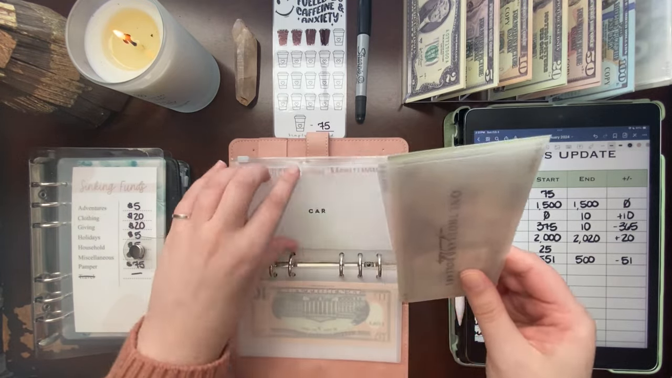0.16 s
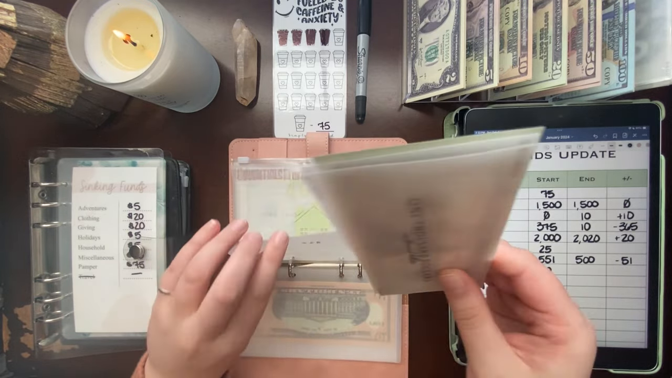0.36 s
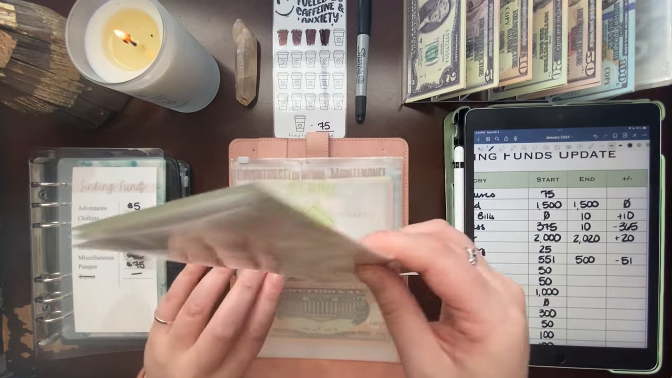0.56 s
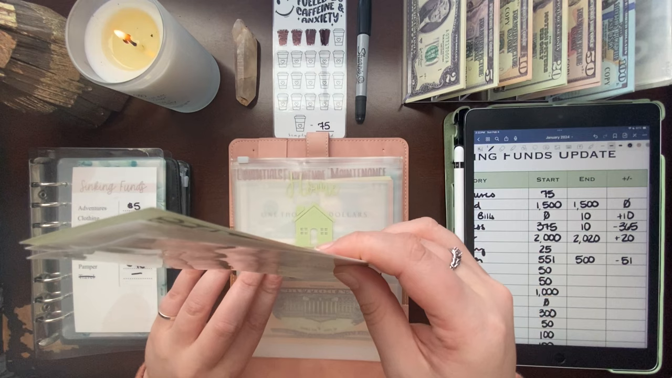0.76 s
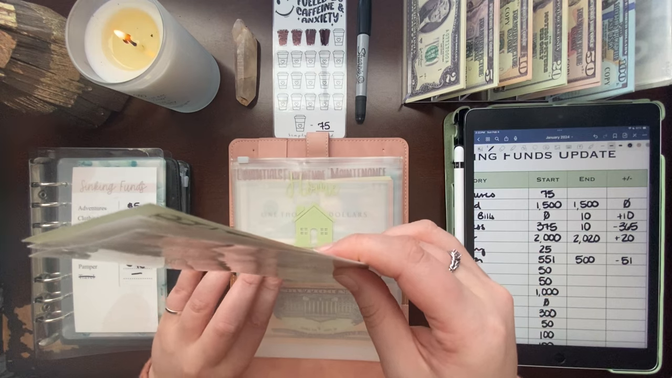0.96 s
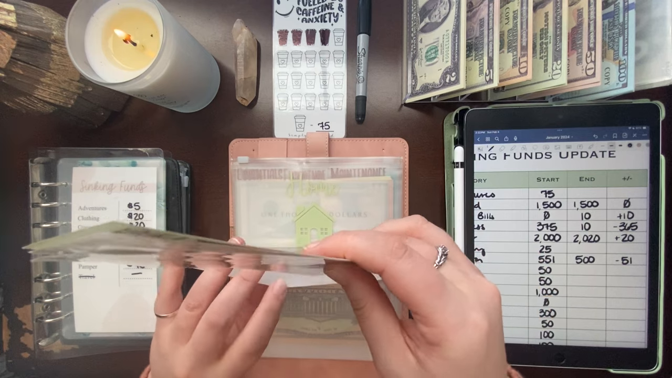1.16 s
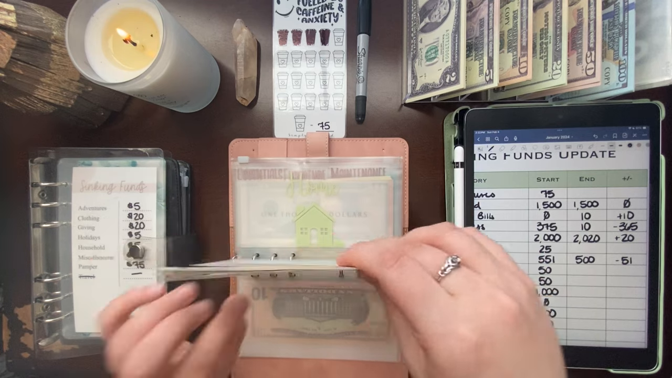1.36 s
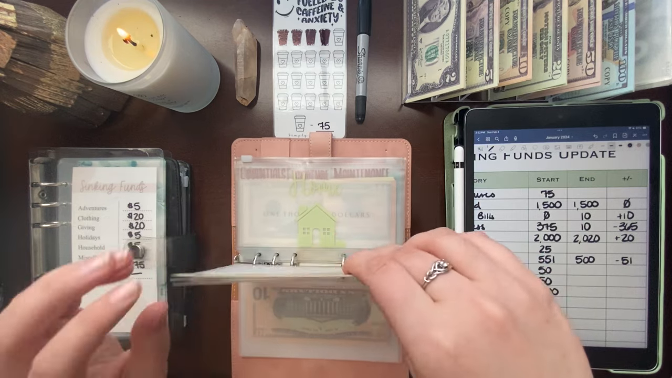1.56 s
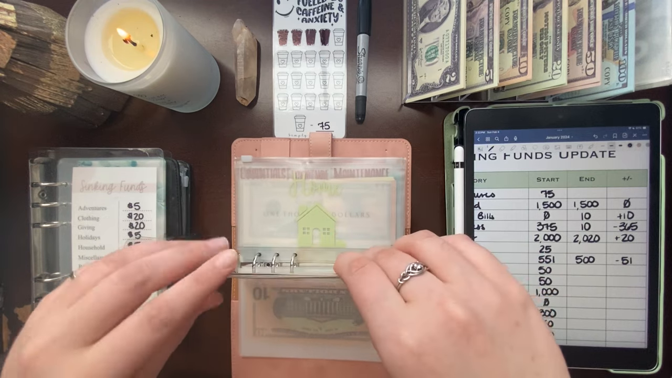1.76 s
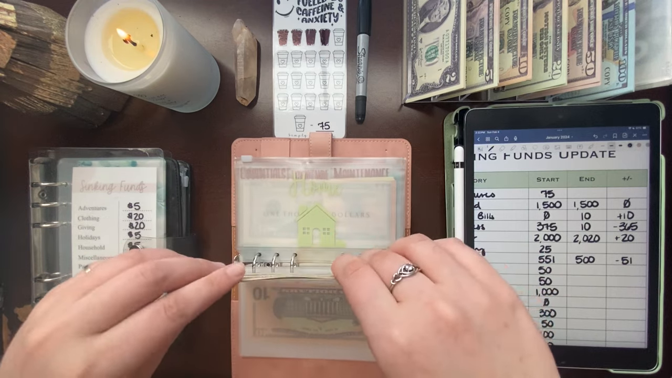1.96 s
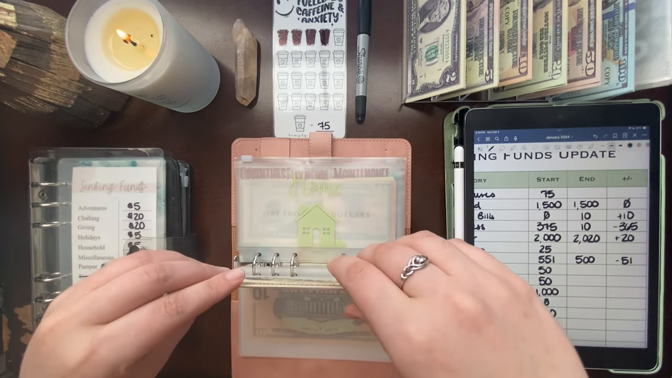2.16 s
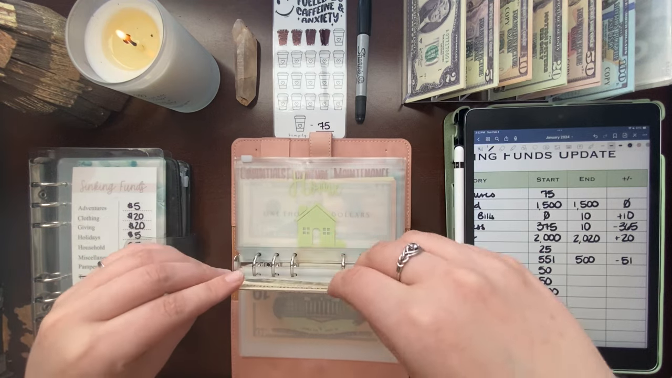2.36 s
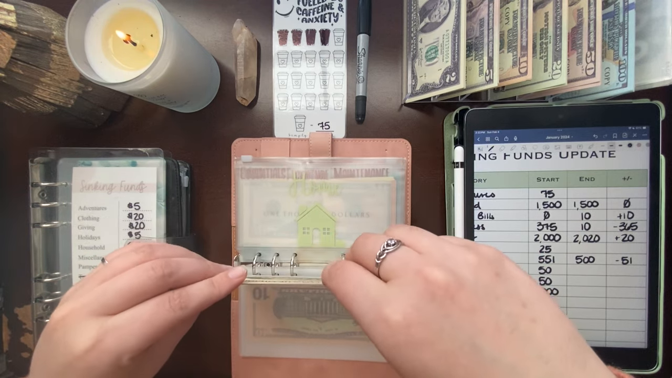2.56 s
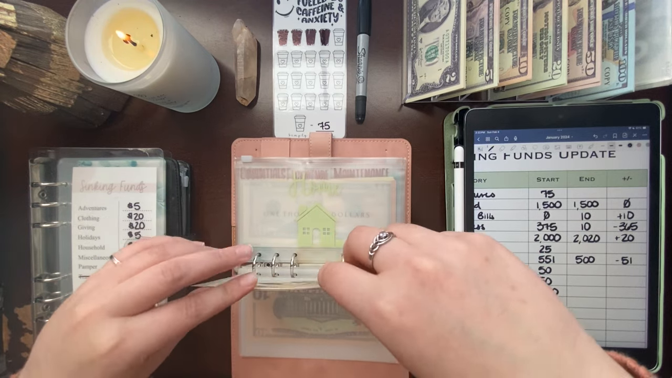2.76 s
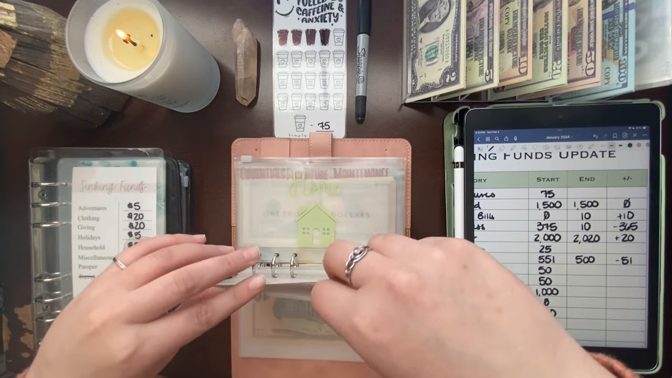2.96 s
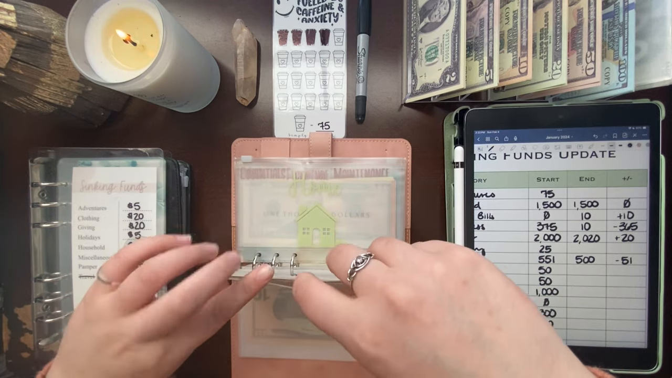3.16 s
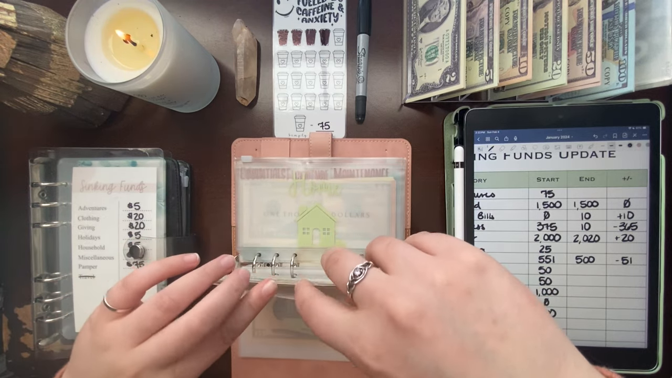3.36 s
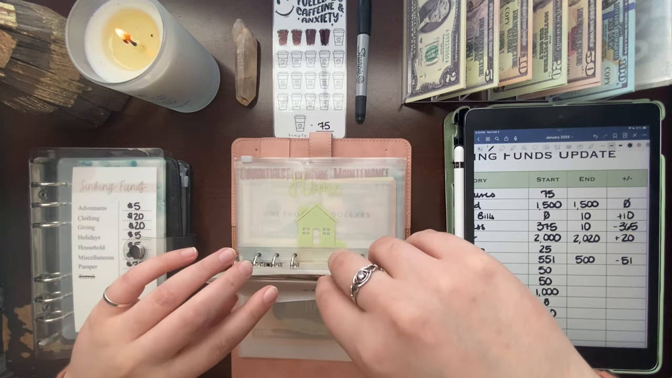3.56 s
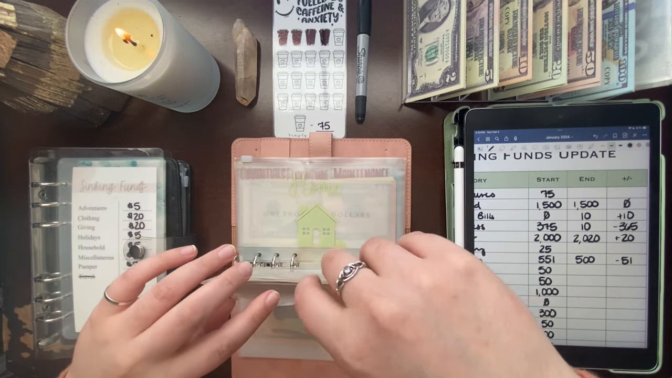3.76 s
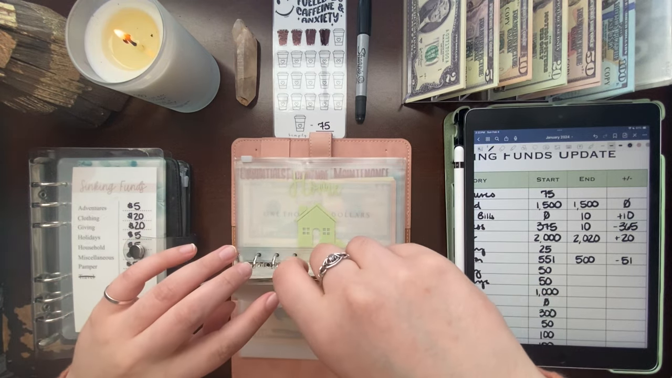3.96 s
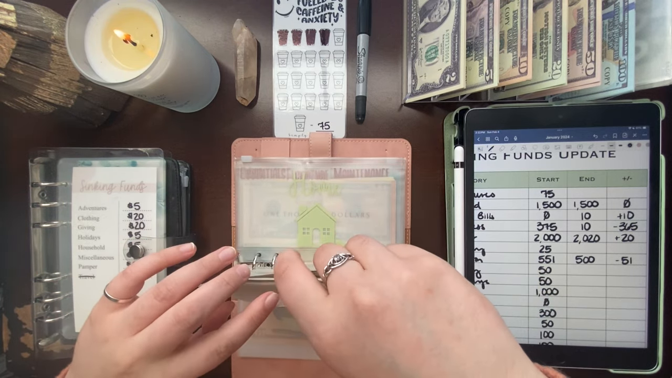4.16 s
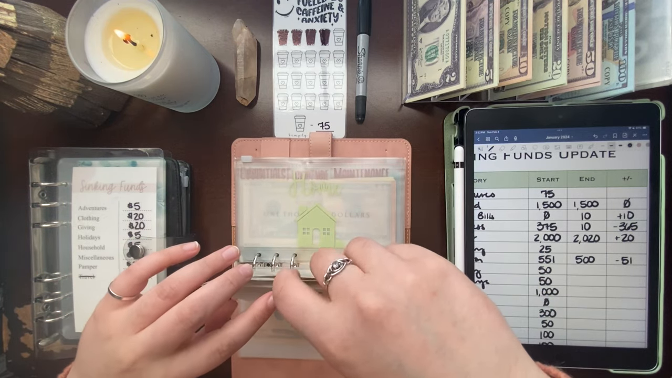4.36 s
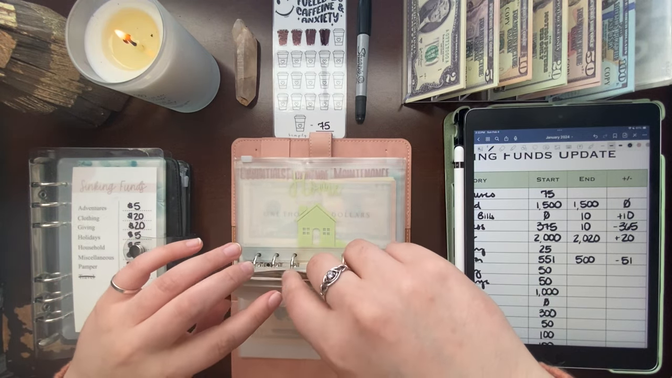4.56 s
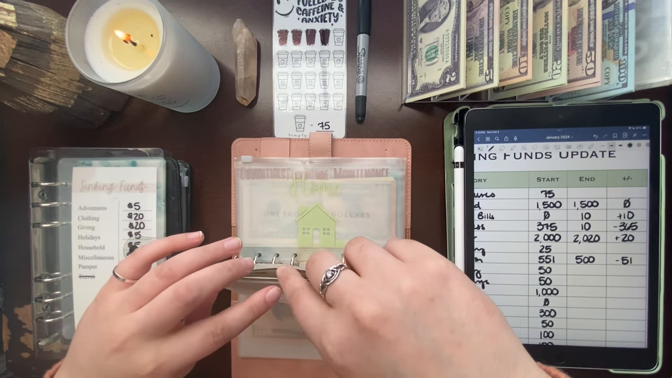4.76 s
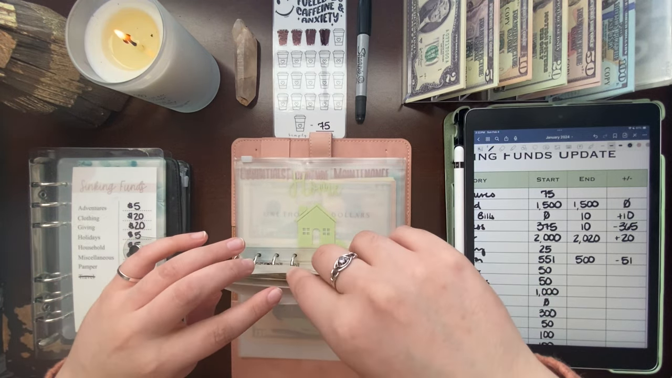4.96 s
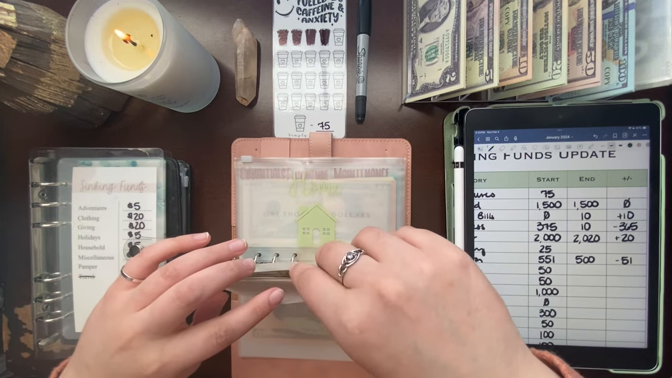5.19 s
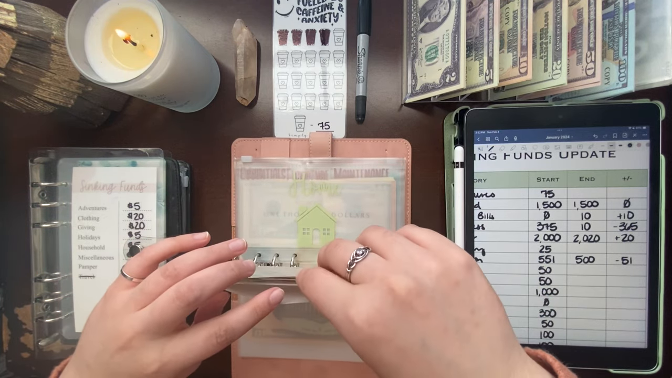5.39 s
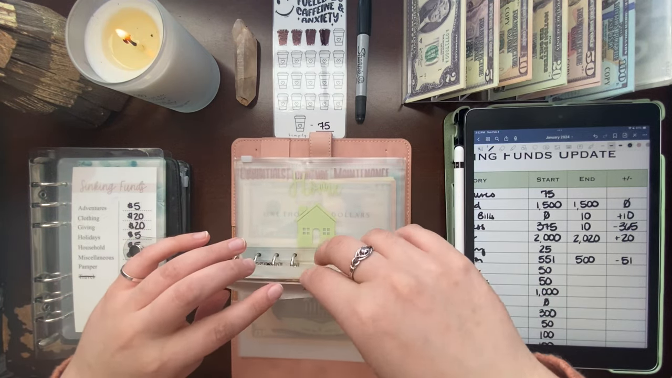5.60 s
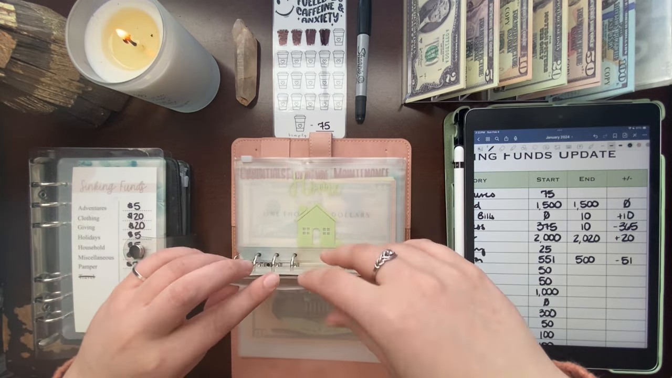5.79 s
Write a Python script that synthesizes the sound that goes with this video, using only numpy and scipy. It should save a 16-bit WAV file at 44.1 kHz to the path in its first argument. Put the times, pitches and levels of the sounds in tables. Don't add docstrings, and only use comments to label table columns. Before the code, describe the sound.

Close plastic film pages flap and slide at a desk, stack squared with knocks, a sharp steel click, then faint ticks.

```python
import sys
import numpy as np
from scipy import signal
from scipy.fft import rfft, irfft, next_fast_len
from scipy.io import wavfile
from scipy.ndimage import uniform_filter1d

SR = 44100
rng = np.random.default_rng(int(sys.argv[2]) if len(sys.argv) > 2 else 0)


def boost(x):
    u = np.asarray(x, float) / 20
    return 10 ** u


def bounce(signal):
    frames = np.transpose(np.atleast_2d(signal))
    limited = np.clip(frames, -1, 1)
    pcm = np.round(limited * 32767).astype(np.int16)
    wavfile.write(sys.argv[1], SR, pcm)


N = 257230

# frequency in Hz, level in dB per Hz.
FLOOR_SPECTRUM = [(8.8, 2), (15, 2.5), (45, -1), (118, -5), (218, -8.5), (300, -10.5), (678, -14.5),
                  (907, -18), (1140, -19), (2240, -20), (3770, -22.5), (7370, -24.5), (10400, -24.5),
                  (15700, -26)]
# frequency in Hz, T60 in seconds.
ROOM_DECAY = [(200, 0.3), (1000, 0.17), (4000, 0.16), (12000, 0.07)]
# frequency in Hz, level in dB.
BINDER_MODES = [(205, -6.5), (436, 2.5), (640, 8), (856, 5.5), (1050, -7), (1250, 5.5), (1480, 7),
                (1700, 2.5), (2000, -12), (2450, -12)]
RING_MODES_HZ = [8670, 12040]
# frequency in Hz, level in dB per Hz.
FILM_HISS = [(2940, -9), (5000, -17), (5900, 0), (7640, 5.5), (8820, 4.5), (9560, 12), (12600, 7.5),
             (15700, 0), (16200, -16), (16400, -42)]
# frequency in Hz, level in dB per Hz.
FILM_BODY = [(1350, -13), (2300, -11), (2430, -3.5), (2920, -3.5), (3260, -2), (5050, -2.5), (5560, -11.5),
             (6500, -8), (8450, -17), (14300, -120)]
# frequency in Hz, level in dB per Hz.
STACK_FLEX = [(59, -36), (100, -32), (183, 7.5), (355, 0.5), (434, 3.5), (1030, -1.5), (1190, -1.5),
              (1880, -9), (2500, -22), (3250, -39), (5500, -120)]
# time in seconds, level in dB.
HAND_GRIP = [(0, -50), (.13, -49.5), (.34, -48.5), (1.1, -54), (1.3, -35.5), (1.5, -48), (1.62, -40.5),
             (1.69, -54), (1.85, -50.5), (2.18, -56), (2.43, -53.5), (2.82, -43.5), (3.0, -43), (3.09, -48),
             (3.59, -51), (4.55, -56.5), (5.36, -53), (5.83, -52.5)]
# middle in seconds, half length in seconds, rubbing in dB, pocket pitch in Hz, hiss share in dB.
FILM_SLIDES = [(0.146, 0.031, -64, 3800, 19), (0.346, 0.22, -56, 3000, -15),
               (1.075, 0.033, -37.5, 3300, -3), (1.52, 0.13, -49.5, 3660, -2),
               (1.67, 0.048, -48.5, 3750, 6), (1.885, 0.065, -40, 3130, -4),
               (1.973, 0.089, -44.5, 3300, 1.5), (2.212, 0.061, -59, 3470, 3), (2.39, 0.14, -53, 3780, 2),
               (2.673, 0.08, -39.5, 3500, -0.5), (3, 0.1, -44.5, 3560, 2), (3.59, 0.055, -57, 3480, -8),
               (3.882, 0.069, -50, 3350, 4), (4.156, 0.12, -57, 3570, -3), (4.77, 0.41, -56.5, 4050, 3),
               (5.365, 0.21, -56, 3820, 1), (5.83, 0.05, -51, 3260, 11)]
# start in seconds, pocket peak in dB, hiss share in dB, pocket pitch in Hz, length in seconds.
FIRM_SCRAPES = [(1.041, -49, 9, 3500, .02), (1.236, -42, 4.5, 3740, 0.061),
                (1.274, -28.5, 5.5, 3140, 0.029), (1.28, -43, -1, 3830, 0.046),
                (1.296, -41, 4, 4100, 0.015), (1.307, -30, 0, 3430, 0.031), (1.323, -38, 7, 4330, 0.013),
                (1.3397, -39.5, 23, 4560, 0.023), (1.36, -51, 8, 4300, 0.013),
                (1.416, -39, 4.5, 3540, 0.049), (1.451, -44, 8, 3560, 0.024), (1.631, -35, -3, 3800, 0.051),
                (1.669, -42, -5, 3870, 0.027), (2.028, -49, 6, 3700, 0.035),
                (2.058, -37, -4.5, 3500, 0.036), (2.68, -35.5, 3, 3300, 0.028),
                (2.735, -50, -12, 1500, 0.047), (2.791, -44, 12.5, 4000, 0.039),
                (2.818, -37.5, 2, 3440, 0.023), (2.993, -41.5, -2, 2900, 0.033),
                (3.028, -41, -2, 2750, 0.046), (3.21, -47, -9, 2950, 0.037),
                (3.925, -50, 12.5, 2520, 0.051), (4.098, -49, -3, 3400, .03), (4.563, -50, -6, 2900, 0.034),
                (4.894, -46, -10, 3180, 0.066), (5.486, -45.5, -4, 2720, 0.051),
                (5.798, -46.5, 3, 2680, 0.036)]
# start in seconds, pocket peak in dB, hiss share in dB, length in seconds.
LIGHT_BRUSHES = [(0.124, -55, 0, 0.0087), (0.138, -67.5, 22.5, 0.081), (2.622, -50, 7, 0.038),
                 (2.709, -44.5, 8.5, 0.037), (2.754, -45.5, 4, 0.033), (2.857, -43, 1.5, 0.03),
                 (3.341, -48, 5.5, 0.051), (3.552, -47, 2, 0.049), (3.856, -54.5, 15.5, 0.025),
                 (4.132, -48, 10.5, 0.048), (4.502, -52.5, 1, 0.096), (4.676, -57, 17.5, 0.036),
                 (4.734, -50, 14.5, 0.039), (5.358, -50.5, 10.5, 0.066), (5.442, -44, 5, 0.049),
                 (5.723, -45.5, 1.5, 0.055)]
# start in seconds, peak in dB, pitch in Hz.
DESK_THUMPS = [(0.039, -43, 400), (.23, -45, 398), (.285, -40, 480), (0.484, -40, 317), (0.518, -44, 288),
               (0.841, -34, 240), (1.021, -35, 148), (1.077, -29.5, 220), (1.097, -29, 212),
               (1.291, -40, 149), (1.316, -25, 195), (1.336, -26, 213), (1.383, -31.5, 205),
               (1.439, -47, 240), (1.543, -32, 346), (1.559, -27, 230), (1.597, -33, 268),
               (1.616, -26, 201), (1.631, -31.5, 218), (2.9183, -19, 209), (2.921, -17.5, 430),
               (2.9265, -19, 237), (2.931, -22, 438), (2.938, -27, 213), (2.952, -33, 205),
               (3.032, -42, 267), (3.158, -39, 262), (3.411, -31, 260), (3.494, -32, 202),
               (5.057, -40, 216), (5.067, -38, 357), (5.468, -43, 414), (5.482, -42, 160),
               (5.301, -42, 350), (5.742, -33.5, 202), (5.748, -40, 438)]
# start in seconds, peak in dB, pitch in Hz.
FILM_PINGS = [(0.126, -35, 3820), (0.371, -28, 2700), (0.491, -41, 3200), (0.516, -37, 3370),
              (1.053, -40, 8620), (1.0536, -32, 3630), (1.076, -42, 4460), (1.097, -48, 3430),
              (1.16, -33, 8700), (1.278, -30, 3360), (1.3036, -39, 4110), (1.3184, -30, 3500),
              (1.3277, -40, 3400), (1.3405, -47, 4400), (1.355, -26, 3800), (1.3597, -33, 4470),
              (1.6407, -39, 4020), (1.648, -29, 3930), (1.657, -34, 3830), (1.6667, -32, 3750),
              (2.07, -39, 3650), (2.934, -29.5, 2530), (2.943, -40, 4400), (2.95, -41, 4300),
              (3.295, -41, 2800), (3.295, -43, 3860), (3.409, -37, 8200), (3.413, -38, 2480),
              (3.493, -33, 7770), (3.802, -49, 3120), (4.223, -42, 3330), (4.2688, -39, 2980),
              (4.2703, -42, 1770), (5.46, -40, 3920), (5.466, -42, 1700), (5.7425, -47, 4530)]
# start in seconds, peak in dB, pitch in Hz.
HARD_SNAP_MODES = [
    (2.9152, -21, 8370),
    (2.9152, -18.5, 9960),
    (2.9152, -22, 11400),
    (2.9152, -28, 13400),
    (2.9153, -27, 6500),
    (2.9157, -26.5, 4220),
    (2.9183, -29, 9200),
]
# strike in seconds, film peak in dB, ring share in dB, film pitch in Hz.
RING_FOOT_TICKS = [(0.675, -56, 15, 2480), (1.0214, -43, -13, 2330), (1.16, -31.5, -0.5, 3100),
                   (1.383, -38, 0, 3660), (1.396, -48, 13, 2910), (1.542, -41, -3, 3040),
                   (2.1847, -38, -19, 3470), (2.6804, -38.5, 10, 3760), (2.843, -43, 5, 3560),
                   (2.9194, -27, 10, 5700), (2.9305, -24, -23, 2200), (3.1596, -41, -3, 4030),
                   (3.409, -33.5, -3, 4070), (3.493, -34.5, -2, 3370), (4.2235, -52, -12, 3300),
                   (4.267, -37.5, -12, 2860), (4.293, -44, 4, 3850), (4.3154, -49, 7, 3870),
                   (5.06, -54.5, 14, 2620), (5.243, -45, -11, 3910), (5.466, -49, -3, 3780)]
# strike in seconds, film peak in dB, ring share in dB, film pitch in Hz.
RING_TIP_TICKS = [(0.1265, -38, 3, 3700), (.3689, -24.5, 5, 2580), (.3723, -30.5, 1, 2520),
                  (.4018, -34, 3, 2610), (.4544, -38, -3, 2390), (1.0636, -24.5, -11, 3580),
                  (1.0983, -41, -14, 3350), (1.125, -40, -12, 3500), (1.26, -24, -5, 3120),
                  (1.4103, -38, 0, 3710), (1.5197, -42, -10, 3770), (1.5973, -37, -4, 4000),
                  (1.6175, -40, -2, 3900), (2.596, -42, 5, 4630), (2.648, -50, 13, 3470),
                  (3.033, -39.5, 9, 2690), (3.405, -33, -13, 3000), (3.2946, -34.5, -5.5, 3750),
                  (4.0342, -49, -11, 3940), (5.7423, -33, -9, 3830)]
# strike in seconds, film peak in dB, ring share in dB, film pitch in Hz.
EDGE_RIFFLES = [
    (.4863, -29, -2, 3100),
    (0.5018, -27.5, -1, 3180),
    (1.0485, -32, -13, 3960),
    (1.0532, -28.5, 2.5, 3460),
    (1.435, -32.5, -13, 3670),
    (5.4595, -30, -21, 2670),
]
# strike in seconds, film peak in dB, ring share in dB, film pitch in Hz.
RING_SNAPS = [(0.366, -38, 11, 2940), (0.4858, -38, 8, 3200), (.5025, -41, 5, 4200), (1.361, -33, 1, 5500),
              (1.365, -37, -7, 4300), (1.6172, -44, -12, 2300), (1.7635, -43, 3, 3500),
              (1.9, -44, -8, 4200), (2.679, -42, 1, 3620), (2.8285, -47, 0, 3611), (2.9154, -31, 9, 4100),
              (2.9163, -25, 5, 3940), (3.0095, -45, 6, 3600), (3.211, -42, -8, 3500),
              (5.596, -44, -8, 3024)]
# ring pitch in Hz, T60 in seconds.
RING_CONTACTS = [
    (7850, 0.032),
    (11900, 0.023),
    (7750, 0.053),
    (10400, 0.0056),
]
# start in seconds, peak in dB, panel pitch in Hz.
PAGE_FLOPS = [(.0385, -38.5, 580), (.126, -45, 626), (.3405, -35.5, 1000), (.3652, -27, 870),
              (.369, -27.5, 1250), (.396, -41, 900), (.4013, -38, 820), (.4045, -31.5, 580),
              (.455, -29.5, 650), (.4745, -26.5, 1250), (.4855, -18, 600), (.4887, -30, 630),
              (.4995, -24.5, 920), (.503, -21.5, 560), (.5135, -27, 1570), (.517, -31, 696),
              (.5235, -30, 1070), (.533, -39, 1200), (.838, -39, 568)]
# start in seconds, peak in dB, panel pitch in Hz.
SQUARING_KNOCKS = [(1.0217, -34.5, 930), (1.0468, -32, 786), (1.053, -28, 980), (1.0595, -28, 734),
                   (1.0643, -25, 1215), (1.069, -35, 680), (1.0759, -26, 1310), (1.085, -33, 1190),
                   (1.09, -36, 454), (1.095, -44, 1120), (1.106, -46, 750), (1.1241, -26.5, 1430),
                   (1.14, -40, 1300), (1.157, -37, 1200), (1.1598, -28, 730), (1.1637, -35, 920),
                   (1.2583, -26, 660), (1.2625, -25.5, 776), (1.268, -44, 630), (1.282, -29.5, 850),
                   (1.293, -30, 1254), (1.318, -27, 480), (1.334, -36, 543), (1.383, -39, 1560),
                   (1.436, -26.5, 877), (1.441, -29.5, 805), (1.5415, -35, 615), (1.5455, -37, 640),
                   (1.559, -44, 600), (1.597, -45, 780), (1.6035, -41, 620), (1.6166, -30.5, 650),
                   (1.63, -45, 620)]
# start in seconds, peak in dB, panel pitch in Hz.
THREADING_KNOCKS = [(2.736, -41, 890), (2.75, -40, 1710), (2.813, -40, 1740), (2.843, -39.5, 1520),
                    (2.912, -39, 820), (2.9155, -25.5, 784), (2.921, -20, 600), (2.9222, -16.5, 610),
                    (2.9264, -18.5, 872), (2.931, -25, 870), (2.9335, -19, 855), (2.9358, -21.5, 786),
                    (2.942, -30, 800), (2.9455, -38, 694), (2.95, -38, 640), (2.955, -39, 586),
                    (2.986, -44, 810), (3.005, -39, 1100), (3.032, -45, 430), (3.16, -43, 710),
                    (3.2935, -37, 680), (3.4077, -30.5, 657), (3.4103, -27.5, 927), (3.417, -46, 845),
                    (3.4928, -35, 790), (3.805, -61, 1000), (3.9, -40, 1310), (3.916, -42, 1840),
                    (3.954, -44, 1170), (4.035, -43, 1120), (4.222, -46, 980), (4.267, -42.5, 1240),
                    (4.694, -42, 550), (5.0595, -37.5, 563), (5.244, -48, 1300), (5.464, -32, 1165),
                    (5.47, -35.5, 810), (5.485, -41, 1090), (5.508, -39, 516), (5.598, -48, 1520),
                    (5.742, -35.5, 700)]

FLOOR_DB, ROOM_DB = -50, -14.5
POCKET_WIDTH_HZ = 720
BRUSH_HZ, STROKE_RISE = 3710, 0.59
RUB_REST_DB, SLIDE_EDGE = -73, 2.1
PING_RISE_S, PING_T60_S = 0.00033, 0.0078
APPROACH_S, APPROACH_DB = .005, -25
KNOCK_T60_S, HARD_DAMPING, SOFT_DB = 0.026, 0.079, -6
STIFF_DAMPING = 0.41


def evened(x):
    return x / np.sqrt(np.mean(x ** 2) + 1e-20)


def peaked(x):
    return x / (abs(x).max() + 1e-12)


def read(points, hz):
    f, value = np.transpose(points)
    return np.interp(np.log(hz + 1), np.log(f + 1), value)


def add(mix, s, sound):
    part = mix[round(s * SR):][:len(sound)]
    part += sound[:len(part)]


def sine(hz, t):
    return np.sin(2 * np.pi * hz * t)


def decay(t, t60):
    return boost(-60 * t / t60)


def coloured(x, points):
    size = next_fast_len(len(x))
    gain = boost(read(points, np.fft.rfftfreq(size, 1 / SR)))
    return evened(irfft(rfft(x, size) * gain, size)[:len(x)])


def resonate(x, hz, width):
    turn = np.exp(2j * np.pi * np.cumsum(hz * np.ones(len(x))) / SR)
    r = np.exp(-np.pi * width / SR)
    smooth = signal.lfilter([(1 - r) ** 2], [1, -2 * r, r * r], x / turn + 1e-18)
    return (turn * smooth).real


def slips(per_s, spread_db):
    size = boost(spread_db * np.minimum(rng.exponential(1, N), 4)) * rng.standard_normal(N)
    return evened(size * (rng.random(N) < per_s / SR))


def lumps(samples, depth_db):
    smooth = uniform_filter1d(rng.standard_normal(N), samples)
    return boost(depth_db * evened(uniform_filter1d(smooth, samples)))


def floor():
    return boost(FLOOR_DB) * coloured(rng.standard_normal(N), FLOOR_SPECTRUM) * lumps(2000, 0.7)


def room(x):
    taps = np.zeros(SR // 2)
    at = np.arange(200, SR // 2 - 20, 20)
    taps[at + rng.integers(0, 20, len(at))] = rng.choice([-1., 1.], len(at))
    hz, t, z = signal.stft(taps, SR, nperseg=256)
    fading = z * decay(t, read(ROOM_DECAY, hz)[:, None])
    tail = signal.istft(fading, SR, nperseg=256)[1]
    return signal.fftconvolve(x, tail / np.linalg.norm(tail))[:N]


def handling():
    t = np.arange(N) / SR
    middle, half, rub_db, pocket_hz, hiss_db = np.transpose(FILM_SLIDES)
    pressure = np.full(N, boost(RUB_REST_DB))
    for s, h, db in zip(middle, half, rub_db):
        pressure += boost(db) * np.exp(-abs((t - s) / h) ** SLIDE_EDGE)
    drive = slips(17000, 1.2) * lumps(330, 0.81)
    pocket = evened(resonate(drive, np.interp(t, middle, pocket_hz), POCKET_WIDTH_HZ))
    body = coloured(drive, FILM_BODY)
    hiss = coloured(drive, FILM_HISS) + 0.2 * body
    rub = pocket + 0.84 * body + boost(np.interp(t, middle, hiss_db)) * hiss
    flex = coloured(slips(3500, 1.3) * lumps(500, 2.6), STACK_FLEX)
    grip_db = np.interp(t, *np.transpose(HAND_GRIP))
    return boost(-16.0) * pressure * rub + boost(grip_db - 6.5) * flex


def scrapes():
    out = np.zeros(N)
    drive = slips(20000, .95) * lumps(90, 1.3)
    rings = sum(evened(resonate(drive, hz, 1700)) for hz in RING_MODES_HZ)
    hiss = evened(coloured(drive, FILM_HISS) + .6 * rings) * lumps(150, 1.1)
    body = coloured(drive, FILM_BODY)
    brushes = [(s, db, hiss_db, BRUSH_HZ, length) for s, db, hiss_db, length in LIGHT_BRUSHES]
    for s, peak_db, hiss_db, pocket_hz, length in list(FIRM_SCRAPES) + brushes:
        s = s - 0.59 * STROKE_RISE * length
        at = slice(round(s * SR), round((s + 1.57 * max(length, .009)) * SR))
        u = np.linspace(0, 1.4, len(drive[at]))
        stroke = np.sin(np.pi / 2 * np.minimum(u / STROKE_RISE, 1)) ** 2 * np.exp(-u ** 12.0)
        narrowing_hz = pocket_hz * (1 + 0.099 * (u - .4))
        pocket = evened(resonate(drive[at], narrowing_hz, POCKET_WIDTH_HZ))
        film = 0.64 * body[at] + boost(hiss_db) * (hiss[at] + 0.5 * body[at])
        add(out, s, boost(peak_db - 12.5) * stroke * (pocket + film))
    return out


def thumps():
    out, t = np.zeros(N), np.arange(6000) / SR
    for s, peak_db, thump_hz in DESK_THUMPS:
        top = sine(thump_hz, t) * decay(t, 0.045)
        push = 0.15 * sine(70, t) * decay(t, 0.18)
        add(out, s, boost(peak_db) * (top + push) * (1 - np.exp(-t / 0.0023)))
    return out


def pings():
    out, t = np.zeros(N), np.arange(1500) / SR
    shape = decay(t, PING_T60_S) * (1 - np.exp(-t / PING_RISE_S)) ** 2
    for s, peak_db, ping_hz in list(FILM_PINGS) + list(HARD_SNAP_MODES):
        add(out, s, boost(peak_db) * peaked(sine(ping_hz, t) * shape))
    return out


def ticks():
    out, t = np.zeros(N), np.arange(3000) / SR
    late = np.maximum(t - APPROACH_S, 0)
    graze = boost(APPROACH_DB) * np.minimum(t / APPROACH_S, 1)
    attack = graze + (1 - np.exp(-late / 0.00023)) ** 2
    kinds = (RING_FOOT_TICKS, RING_TIP_TICKS, EDGE_RIFFLES, RING_SNAPS)
    for events, (ring_hz, t60) in zip(kinds, RING_CONTACTS):
        for s, peak_db, ring_db, film_hz in events:
            rattle = rng.standard_normal(len(t)) * decay(late, t60) * attack
            crack = rattle * (0.37 + decay(late, 0.0066))
            film = peaked(resonate(rattle, film_hz, 1970))
            film = peaked(film + 0.99 * peaked(resonate(crack, 2400, 10000)))
            ring = peaked(resonate(crack, ring_hz, 2600))
            ring = peaked(ring + 3.1 * peaked(resonate(crack, 9340, 7800)))
            add(out, s - APPROACH_S, boost(peak_db) * (film + boost(ring_db) * ring))
    return out


def knocks():
    out, t = np.zeros(N), np.arange(6000) / SR
    hz, db = np.transpose(BINDER_MODES)[:, :, None]
    attack = (1 - np.exp(-t / 0.00054)) ** 2
    for s, peak_db, pitch_hz in list(PAGE_FLOPS) + list(SQUARING_KNOCKS) + list(THREADING_KNOCKS):
        lean, detune = rng.standard_normal((2, len(hz), 1))
        t60 = KNOCK_T60_S * boost(-HARD_DAMPING * (peak_db - SOFT_DB)) * (640 / pitch_hz) ** STIFF_DAMPING
        panel = sine(pitch_hz, t) * decay(t, t60)
        mode_t60 = 1.3 * t60 * (640 / hz) ** 0.6
        modes = boost(db - 14 + 2.5 * lean) * decay(t, mode_t60) * sine(hz * (1 + 0.04 * detune), t)
        add(out, s, -boost(peak_db) * peaked((panel + modes.sum(0)) * attack))
    return out


def scene():
    desk = handling() + scrapes() + thumps() + pings() + ticks() + knocks()
    return (desk + boost(ROOM_DB) * room(desk) + floor())[None]


def top_cut(x):
    return signal.sosfilt(signal.butter(12, 16000, fs=SR, output="sos"), x)


def record(dry):
    lowpass = signal.firwin(301, 15850, fs=SR)[None]
    limited = signal.oaconvolve(dry, lowpass, "same")
    return top_cut(limited)


dry = scene()
out = record(dry)
bounce(out)
```